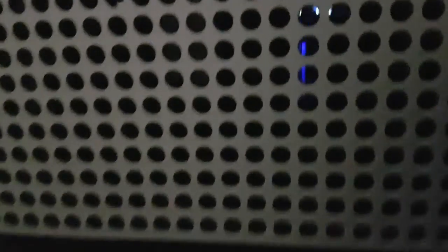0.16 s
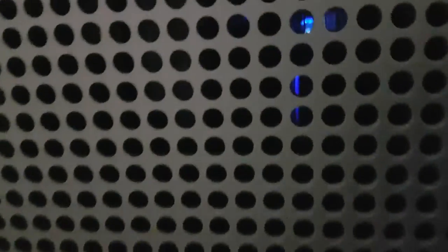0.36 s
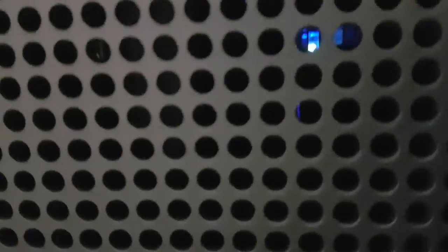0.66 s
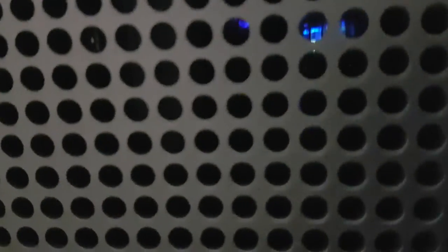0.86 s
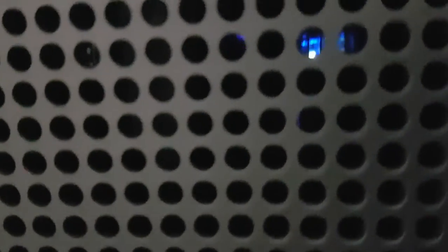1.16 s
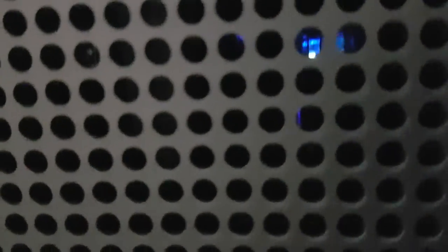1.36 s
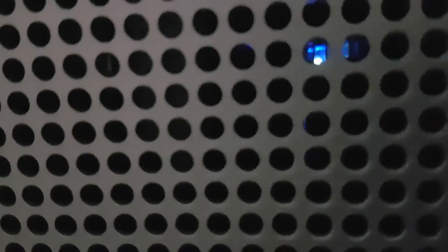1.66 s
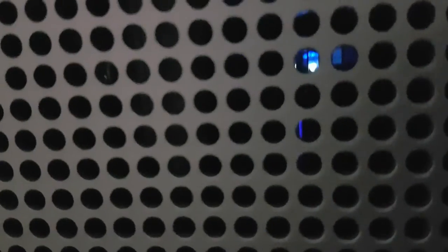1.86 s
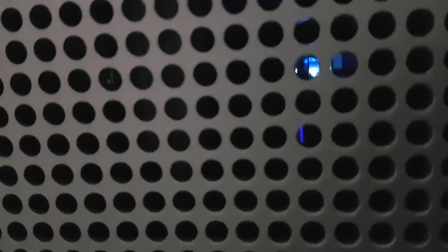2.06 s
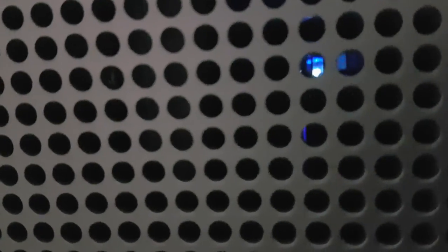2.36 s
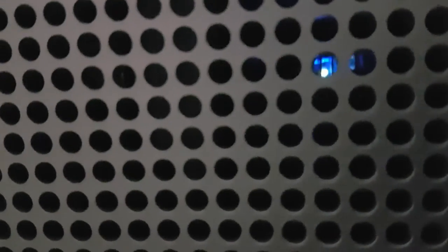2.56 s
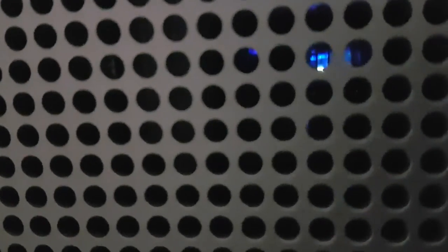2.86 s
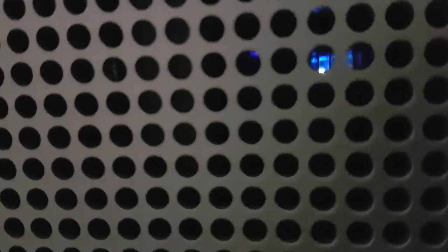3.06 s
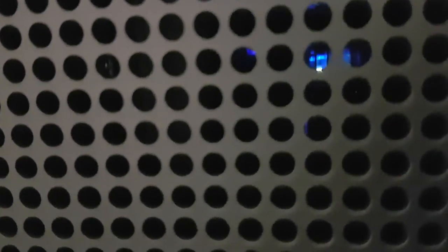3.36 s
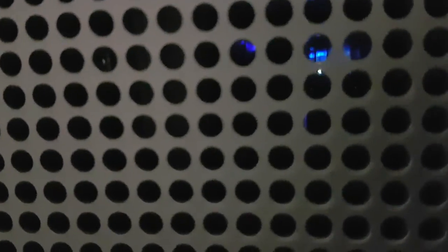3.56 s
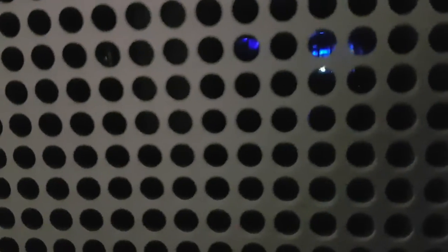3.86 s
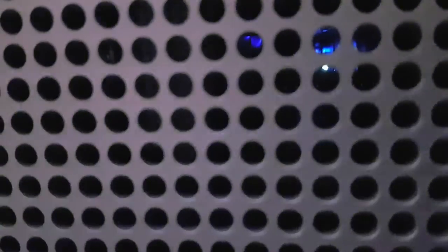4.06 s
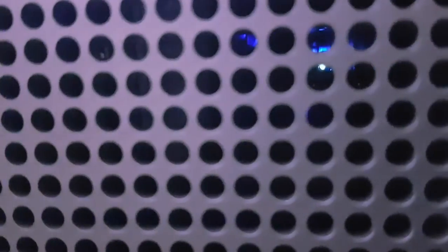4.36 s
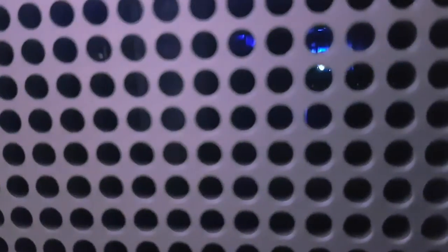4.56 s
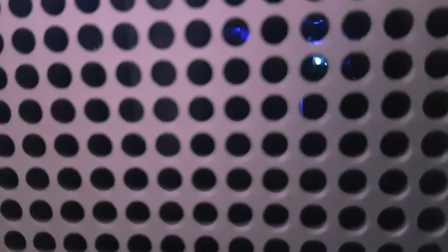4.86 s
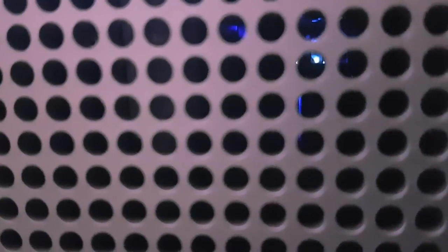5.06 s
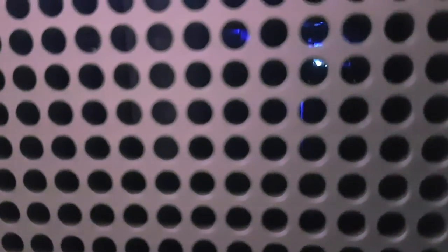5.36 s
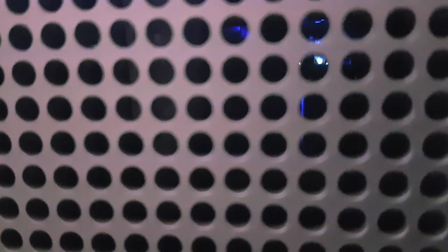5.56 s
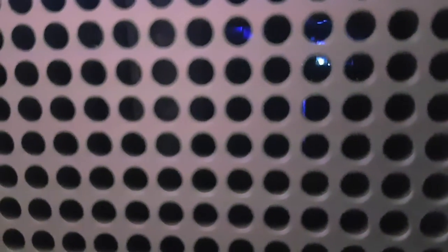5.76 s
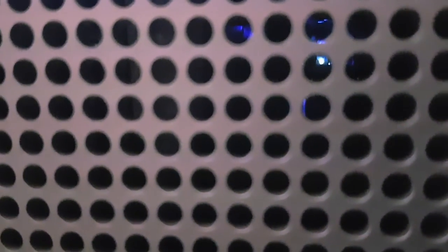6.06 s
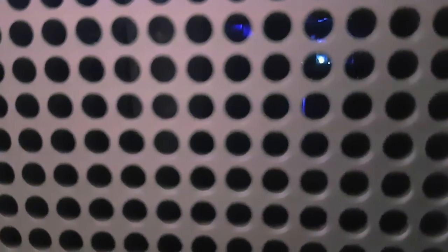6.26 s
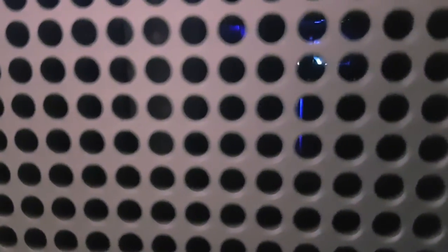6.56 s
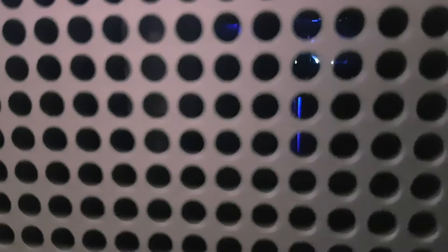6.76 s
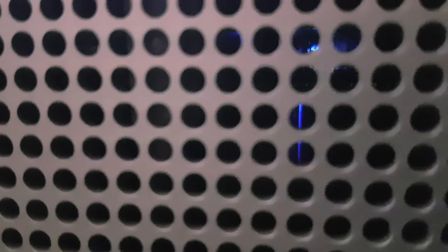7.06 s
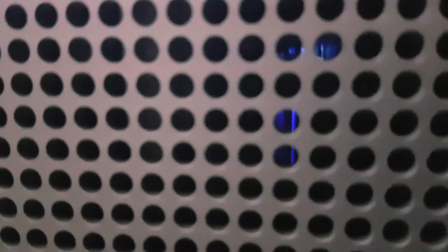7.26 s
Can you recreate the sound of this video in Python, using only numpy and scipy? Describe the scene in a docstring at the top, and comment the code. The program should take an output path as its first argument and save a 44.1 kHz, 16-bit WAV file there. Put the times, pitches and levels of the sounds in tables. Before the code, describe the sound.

A projector hums steadily in a quiet room, its fans rushing softly beneath a thin, high coil whine heard close at the vent grille.

```python
"""The mains hum, coil whine and fans of a projector sound together in a quiet room.
A camera with two microphone ports moves up close to the vent grille; after a thin start the bass fills in.
The power supply hums in mains harmonics, and a coil driven by 240 Hz pulses whines high above.
Fans add wavering thin tones and a soft rush of shaped noise; low puffs touch the microphone.
A light diffuse hiss fades as the camera settles."""
import sys
import numpy as np
from scipy import signal
from scipy.fft import rfft, irfft
from scipy.io import wavfile

SR = 44100
rng = np.random.default_rng(int(sys.argv[2]) if len(sys.argv) > 2 else 0)


def to_wav(sig):
    """Store sig (one row per channel, or 1-D mono) as 16-bit WAV at the path in sys.argv[1].

    Samples outside -1..1 are clipped; the rate is SR.
    """
    pcm = np.clip(np.atleast_2d(sig), -1, 1) * 32767
    pcm = np.round(pcm).astype(np.int16)
    wavfile.write(sys.argv[1], SR, pcm.T)  # frames by channels


N = 326340
TIME = np.arange(N) / SR


def gain_of(db):
    """Decibels to amplitude."""
    return 10 ** (np.asarray(db) / 20)


def evened(x):
    """Scales to an rms of one."""
    return x / np.sqrt(np.mean(x ** 2) + 1e-20)


def curves(rows):
    """Each column of a time table, sample by sample."""
    t, *columns = np.transpose(rows)
    return np.array([np.interp(TIME, t, column) for column in columns])


def spectra(rows, hz):
    """Each column of a frequency table, read on a log axis."""
    f, *columns = np.transpose(rows)
    return np.array([np.interp(np.log(hz + 1), np.log(f + 1), column) for column in columns])


def drift(rate_hz, count=1500):
    """Slow random wander of rms one, its spectrum falling off around rate_hz."""
    t = np.linspace(0, N / SR, count)
    lowpass = np.exp(-(np.fft.rfftfreq(count, t[1]) / rate_hz) ** 2)
    wander = irfft(rfft(rng.standard_normal(count)) * lowpass, count)
    return np.interp(TIME, t, evened(wander))


def shelf(x, corner_hz, gain_db, order):
    """Everything below the corner follows a gain curve."""
    weight = 1 / (1 + (np.fft.rfftfreq(N, 1 / SR) / corner_hz) ** order)
    low = irfft(rfft(x) * weight, N)
    return x + low * (gain_of(gain_db) - 1)


def tone(hz, left_db, right_db, lead, phase):
    """One line at both ports, which sit at different places in its sound field."""
    angle = 2 * np.pi * hz * TIME + phase
    left = gain_of(left_db) * np.sin(angle - lead / 2)
    right = gain_of(right_db) * np.sin(angle + lead / 2)
    return np.sqrt(2) * np.array([left, right])  # levels are rms


MAINS_HZ = 60
# Mains hum at the ports before the nearness gain:
# f/mains frequency, left level/dB, right level/dB, lead of the right port/rad
HUM_LINES = [(4, -71.5, -66, 1), (5, -52.5, -49.0, 0.29), (6, -52.5, -48.5, 0.34), (8, -68, -58, 1.4),
             (9, -53, -47.5, 0.34), (10, -68, -61, -2.5), (11, -64.5, -54.5, -0.3), (12, -81, -65.5, -2.5),
             (16, -70, -67, 1), (20, -72.5, -59.5, -3)]
# Nearness of the microphone to the grille, also used for fans and air: t/s, gain of the hum/dB
GRILLE_NEARNESS = [(0, -3), (.45, -2.4), (.8, -1), (1.25, -1.5), (1.7, -0.5), (2.3, -0.9), (3, 0.36),
                   (4.4, 0.3), (6.2, 0), (7.4, -0.4)]


def hum(level_db=0):
    """Mains harmonics of the power supply, steady in pitch and louder close to the grille."""
    lines = sum(tone(round(k) * MAINS_HZ, *ports, 2 * np.pi * rng.random())
                for k, *ports in HUM_LINES)
    return lines * gain_of(level_db + curves(GRILLE_NEARNESS))


# Shaft and blade tones before the nearness gain:
# f/Hz, left level/dB, right level/dB, lead of the right port/rad
ROTOR_TONES = [(195.1, -63.3, -61.8, 0.2), (203, -57.2, -59.6, 0.0), (319, -67.5, -69.0, 0.7),
               (335.1, -64.7, -61.5, 0.2), (347.9, -70.8, -66.6, 0.1), (376.8, -61.4, -57.5, 0.1),
               (390.3, -65.0, -61.4, 0.2), (405.8, -68.7, -67.1, -0.1), (448.9, -60.4, -51.5, 0.4),
               (463.6, -67.8, -59.7, 0.5), (580, -67.7, -82.7, 2.8), (609, -65.3, -65.2, -0.5),
               (753.7, -74.9, -67.2, -0.3), (786, -82.4, -63.0, -1.0), (811.5, -82.8, -66.5, -0.9),
               (870, -82.9, -71.1, -0.8), (898.1, -66.1, -59.2, -2.8), (927.9, -81.4, -71.5, 0.7),
               (1004.7, -80.9, -65.9, -0.1), (1115.7, -78.6, -70.7, -3.0), (1178.9, -94.0, -71.6, -2.9),
               (1226, -82.1, -63.5, 1.5), (1246.9, -79.7, -73.0, -2.6), (1275.8, -71.0, -63.6, 2.9),
               (1337.1, -76.8, -68.7, -2.7), (1448.8, -81.3, -75.8, -2.8), (1571.9, -85.2, -77.8, -2.6),
               (1783.2, -92.5, -82.1, -2.4), (2261.7, -82.3, -83.6, 0.1), (2582, -93.0, -82.6, 0.0)]


def fans(level_db=0, wander_rad=0.49, near_share=0.66):
    """Fan tones, each wavering slightly in phase with the speed of its rotor."""
    lines = sum(tone(*row, 2 * np.pi * rng.random() + wander_rad * drift(0.61))
                for row in ROTOR_TONES)
    return lines * gain_of(level_db + near_share * curves(GRILLE_NEARNESS))


PULSE_HZ = 240  # rate of the pulses that drive the coil
COMB_SHIFT_HZ = 202.7  # the second, weaker comb lies this far above multiples of the pulse rate
DISPERSION = 1.22  # phase of a coil line in the case, radians per squared multiple
APPROACH_S = 0.53  # time scale on which the camera closes in or draws back
LEAVE_S = 7.84  # by now, past the end, the camera would be far off again
# Coil whine before sway and ripple:
# f/pulse rate, left level/dB, right level/dB, lead of the right port/rad
COIL_LINES = [(8, -89.3, -75.9, -1.0), (10, -94.5, -85.6, 1.7), (11, -80.6, -72.8, 1.0),
              (12, -87.4, -71.7, 2.1), (13, -85.6, -79.6, 1.0), (14, -70.3, -72.7, -0.1),
              (15, -90.9, -73.5, 2.0), (16, -78.2, -75.1, -0.8), (17, -88.4, -85.4, -1.4),
              (18, -86.9, -76.6, -0.0), (19, -89.7, -77.5, -0.3), (20, -70.8, -78.9, -0.8),
              (21, -73.7, -69.3, 2.3), (22, -76.9, -65.8, 2.0), (23, -84.6, -84.3, 0.1),
              (24, -74.6, -69.2, 1.3), (25, -88.0, -69.8, 2.8), (26, -97.9, -87.1, 2.3),
              (27, -96.8, -77.8, 1.3), (28, -88.1, -79.2, 2.1), (32, -92.4, -87.6, 0.8),
              (35, -88.6, -90.3, 1.9), (36, -87.0, -97.1, -2.5), (39, -73.6, -84.4, 1.8),
              (40, -83.4, -93.3, -0.7), (41, -64.9, -78.7, -1.5), (42, -74.1, -84.7, 2.4),
              (43, -71.7, -80.3, 3.1), (44, -71.1, -81.1, -2.5), (45, -68.2, -69.8, 1.0),
              (46, -74.1, -82.1, -1.4), (47, -67.9, -73.5, -0.9), (48, -77.9, -85.1, -0.1),
              (49, -74.1, -85.5, 1.6), (50, -80.1, -87.5, -1.9), (51, -77.7, -92.1, -1.4),
              (52, -84.3, -88.0, -0.5), (53, -83.5, -78.1, 2.3), (55, -78.6, -77.4, 1.9),
              (57, -88.1, -91.5, -1.8), (58, -95.3, -88.8, -2.7), (59, -88.0, -89.2, 1.3),
              (61, -92.9, -88.9, 1.8)]
# Second comb, before its upward shift, sway and ripple:
# f/pulse rate, left level/dB, right level/dB, lead of the right port/rad
SHIFTED_LINES = [(39, -82.2, -109.7, 1.3), (43, -83.8, -96.6, 2.1), (44, -78.3, -93.6, -0.0),
                 (45, -73.8, -88.7, 0.3), (52, -86.8, -97.8, 1.3)]
# Sway of the camera along the grille: t/s, position from -1 to 1
CAMERA_POSITION = [(0.0, -0.58), (0.28, 0.78), (0.45, -0.026), (0.62, 0.68), (0.85, -0.42), (1.35, -0.45),
                   (1.9, 1.0), (2.6, 0.76), (3.4, 0.25), (4.2, 0.16), (5.1, -0.23), (6.8, -0.27),
                   (7.4, 0.034)]
# Standing waves of the strong coil lines, before each line is evened to its mean power:
# f/pulse rate, level when far off/dB, level slope/dB per unit of position
STANDING_WAVES = [(14, 1.9, -0.7), (21, 0.4, 1.6), (22, -10.1, 1.0), (24, 2.5, 3.2), (25, -14.8, -1.0),
                  (39, -2.0, 1.7), (41, -4.1, -1.6), (43, 1.8, -1.7), (44, 2.5, -7.6), (45, -4.1, -2.1),
                  (49, 1.7, 3.1), (55, -11.5, 2.2)]


def whine(level_db=0, ripple_db=0.5, tremor_db=0.69, far_db=-2.5, swirl_db=3.5,
          scatter_rad=0.59, shake_s=8e-6):
    """Two combs of coil lines that swell and fade as the ports cross their standing waves."""
    lines = [(k * PULSE_HZ, *ports) for k, *ports in COIL_LINES]
    lines += [(k * PULSE_HZ + COMB_SHIFT_HZ, *ports) for k, *ports in SHIFTED_LINES]
    # the camera comes in, stays, then starts to leave
    far = sum(np.exp(-((TIME - t) / APPROACH_S) ** 2) for t in (0, LEAVE_S))
    # one move takes the ports toward a peak of some lines and a node of others
    position = curves(CAMERA_POSITION)[0]
    strong = {round(k) * PULSE_HZ: off_db * far + slope_db * position
              for k, off_db, slope_db in STANDING_WAVES}
    delay_s = shake_s * drift(2.6)  # the unsteady hand changes the travel time of all lines alike
    out = np.zeros((2, N))
    for hz, *ports in lines:
        # the ringing case smears each pulse over the whole cycle, so the lines sing rather than buzz
        phase = DISPERSION * (hz / PULSE_HZ) ** 2 + scatter_rad * rng.standard_normal()
        sway_db = strong.get(hz, far * (far_db + swirl_db * drift(2.8)))
        sway = evened(gain_of(sway_db))  # keeps the line's mean power
        port_db = ripple_db * np.array([drift(0.95), drift(0.62)])  # each port meets its own peaks and nodes
        flicker = gain_of(port_db + tremor_db * drift(33))
        out += tone(hz, *ports, phase - 2 * np.pi * hz * delay_s) * sway * flicker
    return gain_of(level_db) * out


# Rush of air before the level offset and shelves: f/Hz, left level/dB per Hz, right level/dB per Hz
AIR_SPECTRUM = [(20, -109, -94), (60, -85, -88.5), (117, -80.5, -79.5), (290, -78, -82.5), (416, -77, -76),
                (614, -81, -77.5), (1295, -94.5, -87), (1604, -96, -95.5), (2540, -104.4, -99.6),
                (3770, -111.2, -107.6), (6750, -117.6, -110.5), (8850, -121.5, -122.6),
                (10600, -111.9, -114.3), (15100, -111.8, -110.6)]
# The rush at the two ports, before the likeness is reduced toward the treble:
# f/Hz, likeness from 0 to 1, lead of the right port/rad
PORT_LIKENESS = [(40.0, 0.52, -0.08), (200.0, 0.85, 0.12), (420.0, 0.94, 0.09), (620.0, 0.88, -0.31),
                 (800.0, 0.68, -0.88), (1000.0, 0.54, -2.14), (1300.0, 0.23, -3.31), (1800.0, 0.08, -2.05)]


def air(level_db=1.25, body_hz=650, near_share=1.0, diffuse_hz=2500, eddy_hz=160, eddy_db=2.5):
    """Turbulent rush of the fans: its body grows with nearness and its lowest part comes in eddies."""
    hz = np.fft.rfftfreq(N, 1 / SR)
    likeness, lead = spectra(PORT_LIKENESS, hz)
    likeness = np.clip(likeness, 0, 1) / (1 + (hz / diffuse_hz) ** 4)
    shared, own = rfft(rng.standard_normal((2, N))) * np.sqrt(SR / 2)  # unit power per Hz
    right = likeness * shared * np.exp(1j * lead) + np.sqrt(1 - likeness ** 2) * own
    ports = np.array([shared, right])
    rush = irfft(ports * gain_of(spectra(AIR_SPECTRUM, hz) + level_db), N)
    rush = shelf(rush, body_hz, near_share * curves(GRILLE_NEARNESS), order=4)
    return shelf(rush, eddy_hz, eddy_db * drift(3.9), order=4)


# Soft low puffs on the microphone: t of the peak/s, length/s, left level at the peak/dB
PUFF_SWELLS = [(3.168, 0.084, -47), (4.3, 0.079, -46.5), (7.154, 0.15, -53), (7.387, 0.12, -49)]


def puffs(low_hz=60, high_hz=115, right_db=-4, own_share=0.64):
    """Short, soft swells of low turbulence, partly different at each port."""
    band = signal.butter(2, [low_hz, high_hz], "band", fs=SR, output="sos")
    shared = rng.standard_normal(N)
    own = own_share * rng.standard_normal((2, N))
    noise = signal.sosfilt(band, shared + own)
    # the sign evens out the strength, so the swell shapes each puff
    eddies = evened(signal.sosfilt(band, np.sign(noise)))
    swell = sum(gain_of(db) * np.exp(-2 * (2 * (TIME - t) / length) ** 2)
                for t, length, db in PUFF_SWELLS)
    return eddies * swell * gain_of([[0], [right_db]])


# Light hiss that fades as the camera settles: t/s, level/dB
HISS_LEVEL = [(0, -71), (.55, -68), (.7, -76), (1.2, -100)]


def hiss(low_hz=1800, high_hz=7200):
    """Thin, diffuse band of noise, unrelated at the two ports."""
    band = signal.butter(4, [low_hz, high_hz], "band", fs=SR, output="sos")
    noise = evened(signal.sosfilt(band, rng.standard_normal((2, N))))
    return noise * gain_of(curves(HISS_LEVEL))


def scene():
    """The projector as heard by the microphone ports at its grille."""
    return hum() + fans() + whine() + air() + puffs() + hiss()


EDGE_HZ = 15750  # upper band limit
# Fullness of the bass at the microphone: t/s, gain/dB
BASS_FULLNESS = [(0, -2), (.2, -8.5), (1.2, -10), (1.45, -1.5), (1.75, 0), (3, -1), (4.5, -0.5), (6, .5),
                 (6.7, -1), (7.4, 0.5)]


def record(dry, bass_hz=290):
    """The bass fills in after a thin start; then a steep lowpass limits the band."""
    filled = shelf(dry, bass_hz, curves(BASS_FULLNESS), order=20)
    lowpass = signal.firwin(2047, EDGE_HZ, window=("kaiser", 9), fs=SR)
    return signal.oaconvolve(filled, lowpass[None], "same", axes=1)


dry = scene()
out = record(dry)
to_wav(out)
```